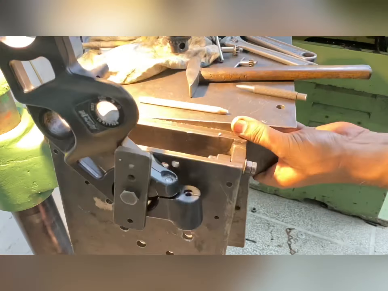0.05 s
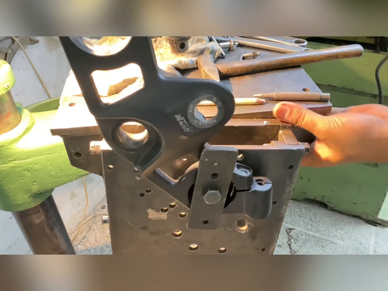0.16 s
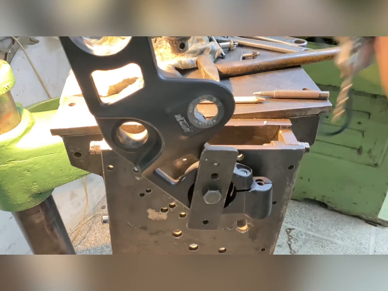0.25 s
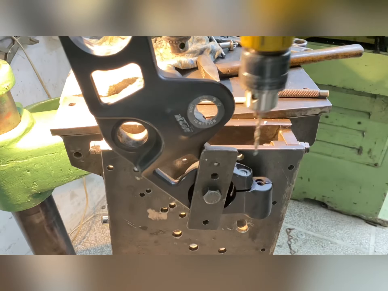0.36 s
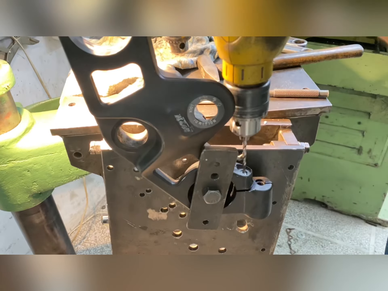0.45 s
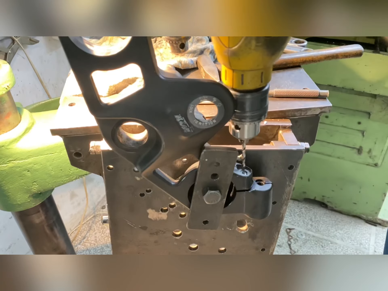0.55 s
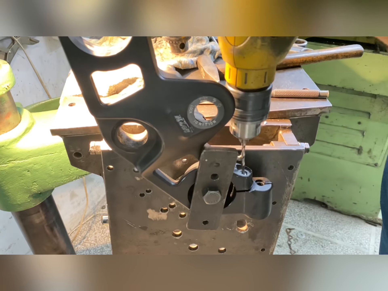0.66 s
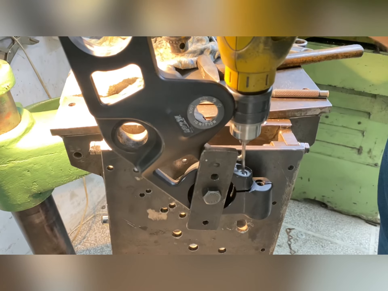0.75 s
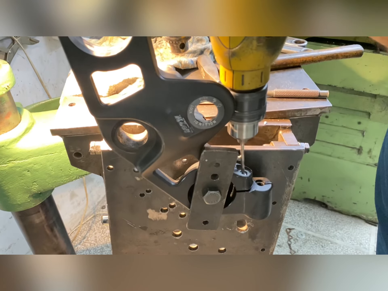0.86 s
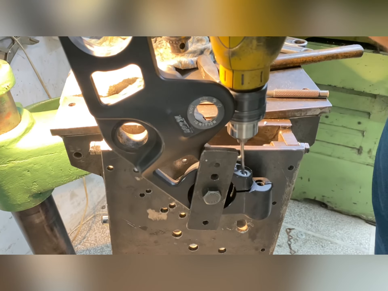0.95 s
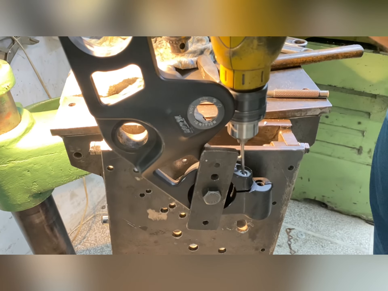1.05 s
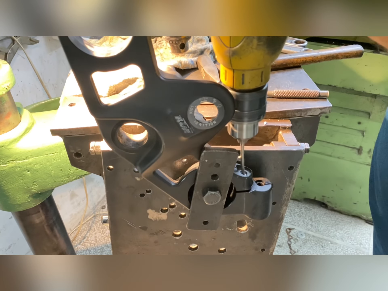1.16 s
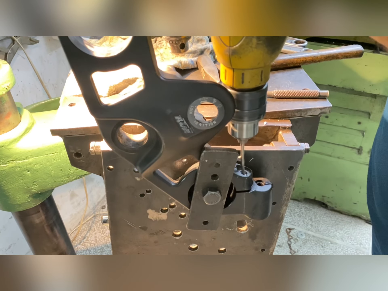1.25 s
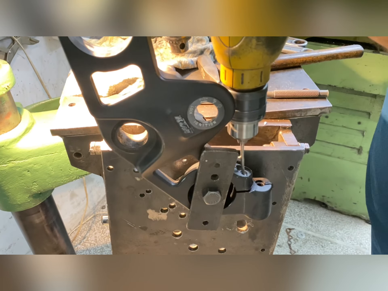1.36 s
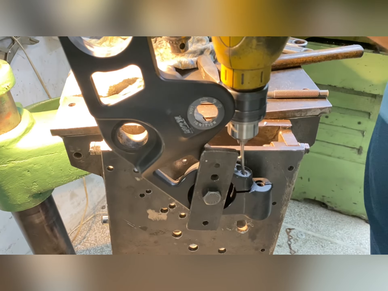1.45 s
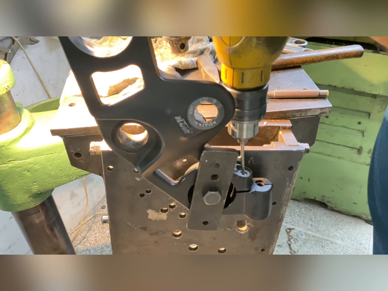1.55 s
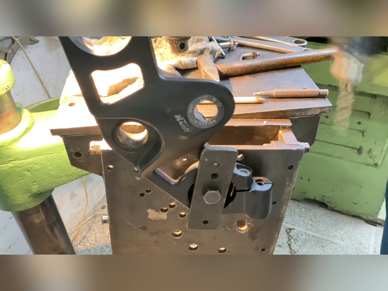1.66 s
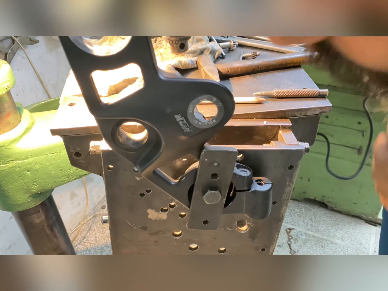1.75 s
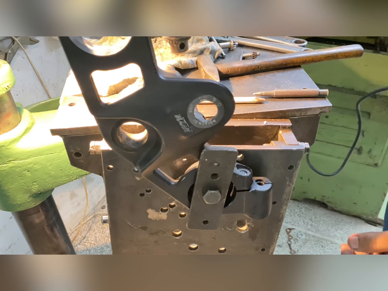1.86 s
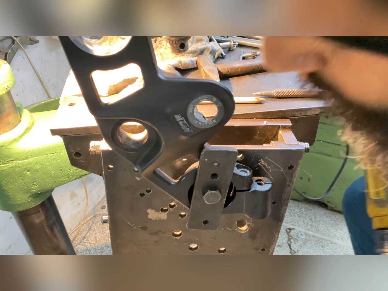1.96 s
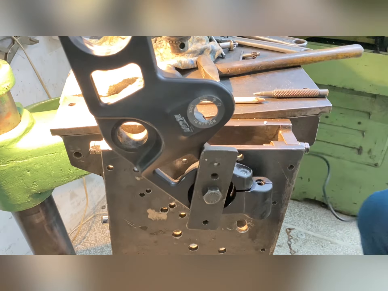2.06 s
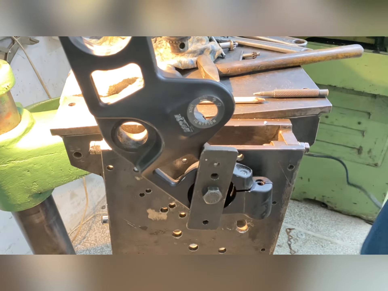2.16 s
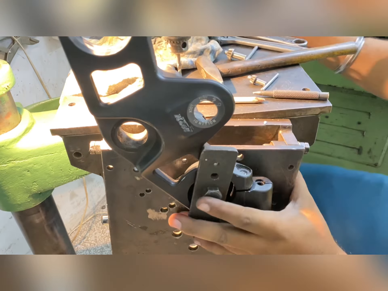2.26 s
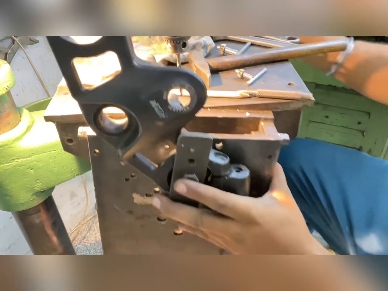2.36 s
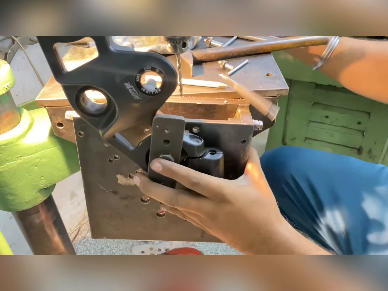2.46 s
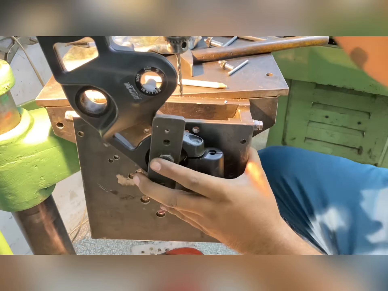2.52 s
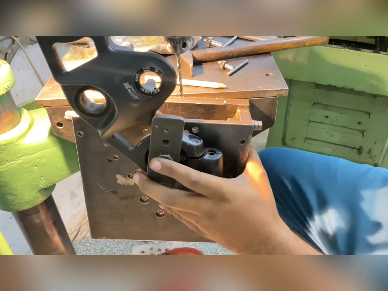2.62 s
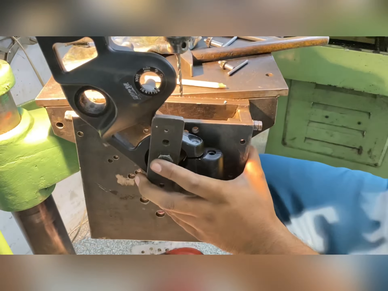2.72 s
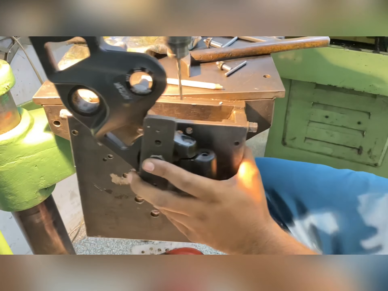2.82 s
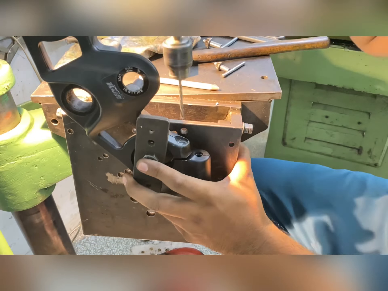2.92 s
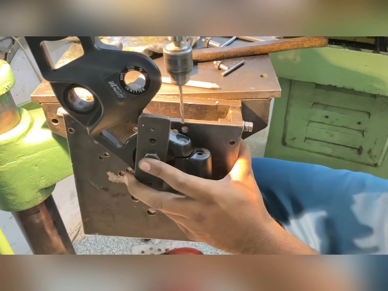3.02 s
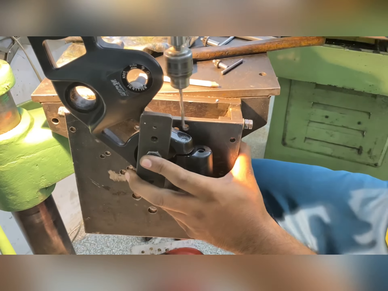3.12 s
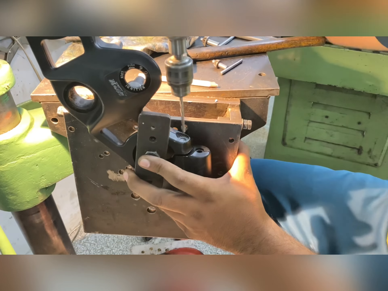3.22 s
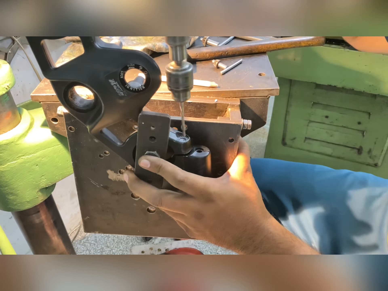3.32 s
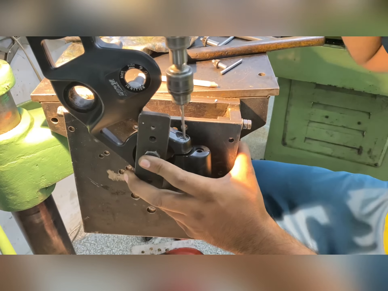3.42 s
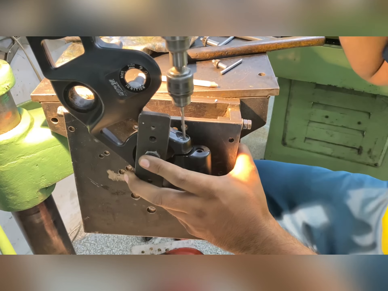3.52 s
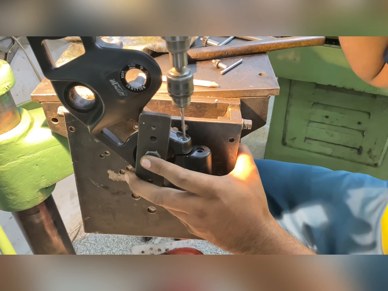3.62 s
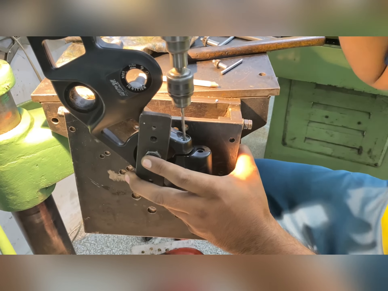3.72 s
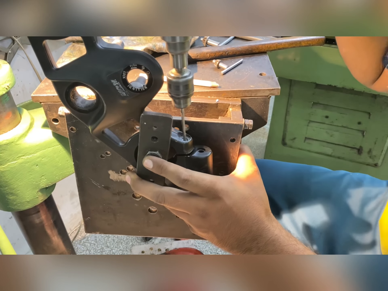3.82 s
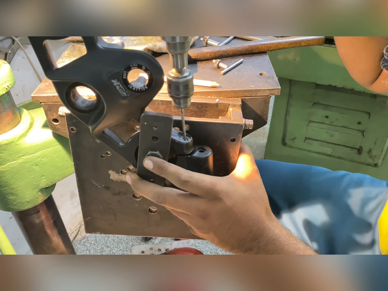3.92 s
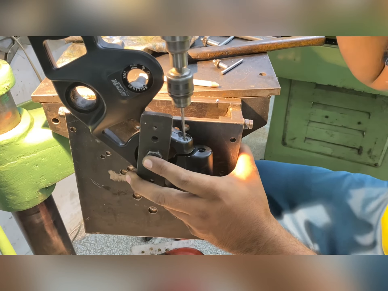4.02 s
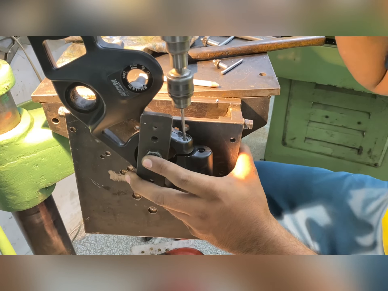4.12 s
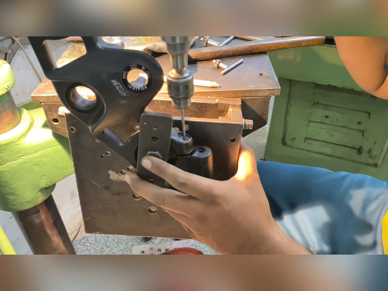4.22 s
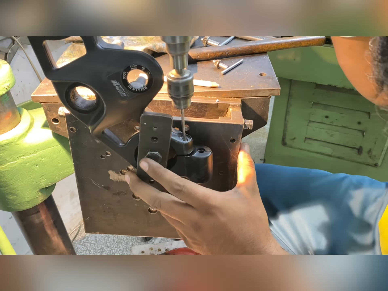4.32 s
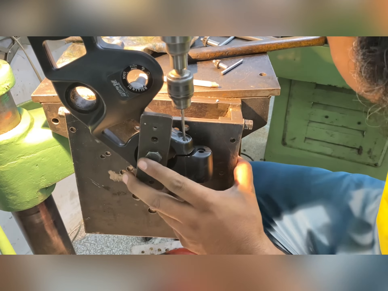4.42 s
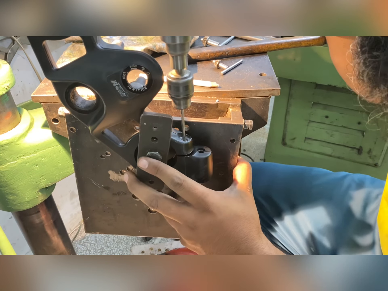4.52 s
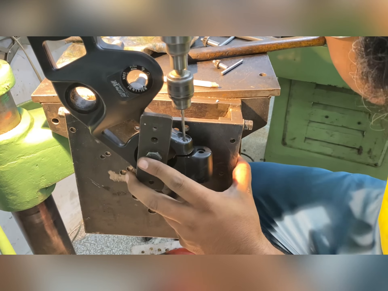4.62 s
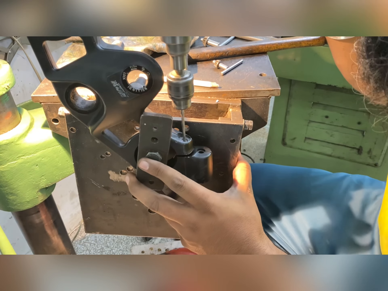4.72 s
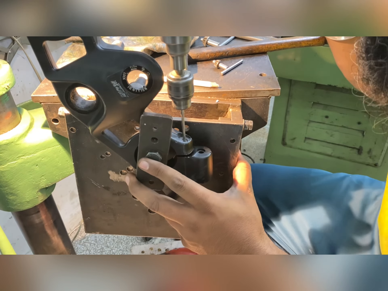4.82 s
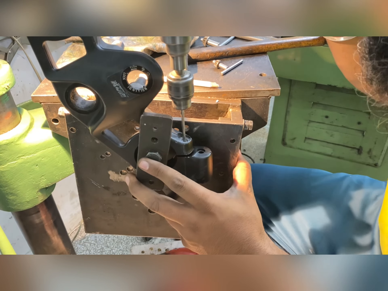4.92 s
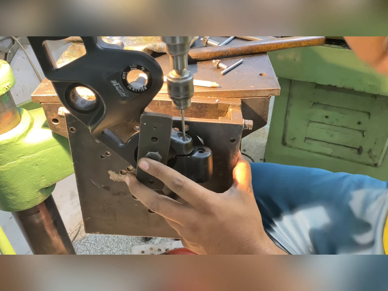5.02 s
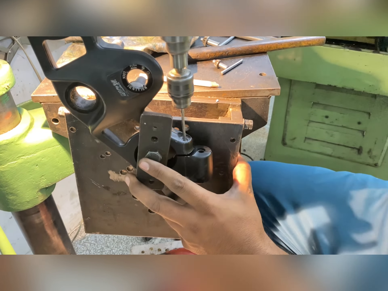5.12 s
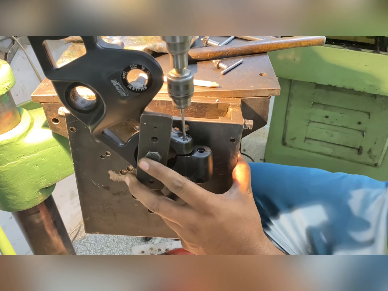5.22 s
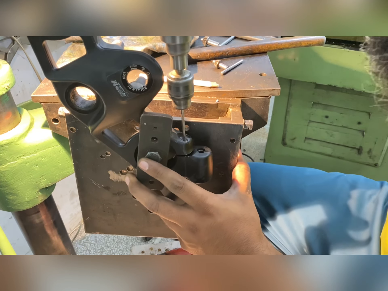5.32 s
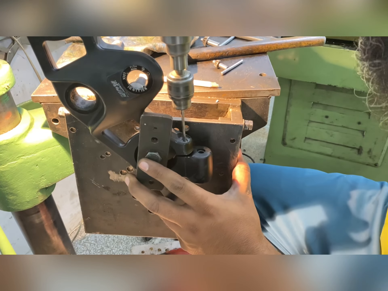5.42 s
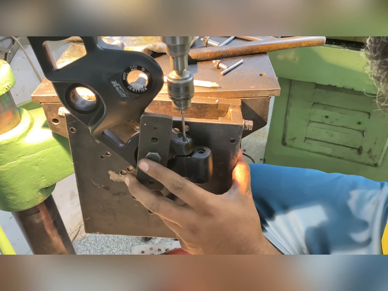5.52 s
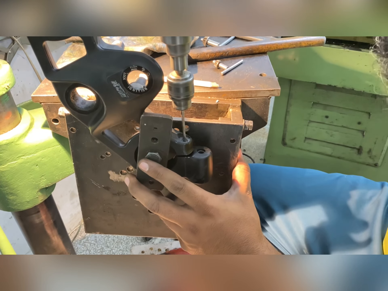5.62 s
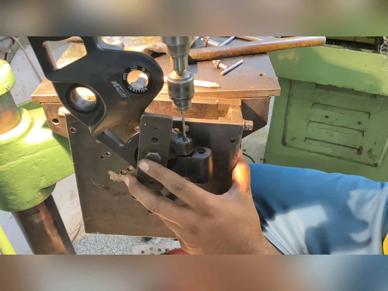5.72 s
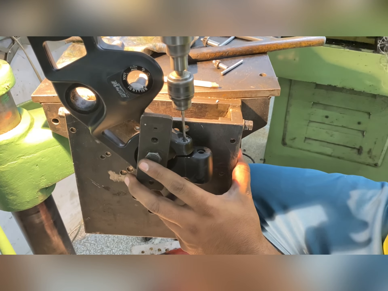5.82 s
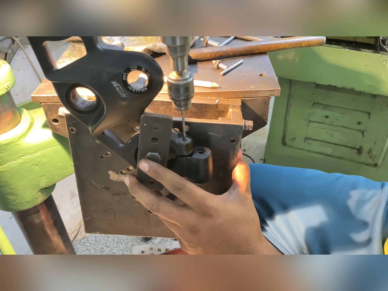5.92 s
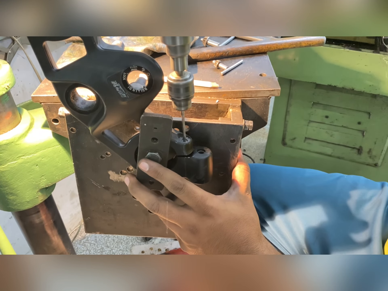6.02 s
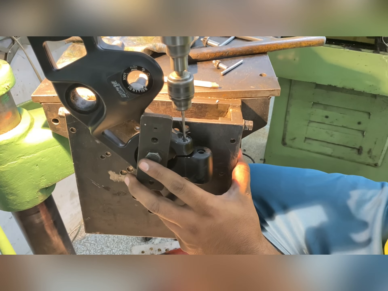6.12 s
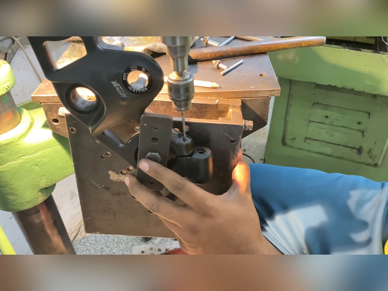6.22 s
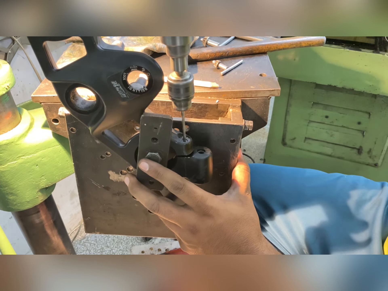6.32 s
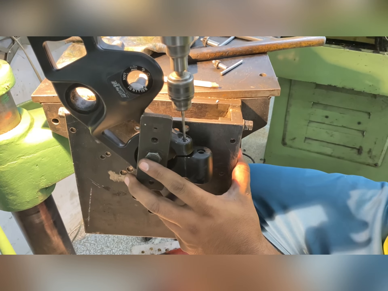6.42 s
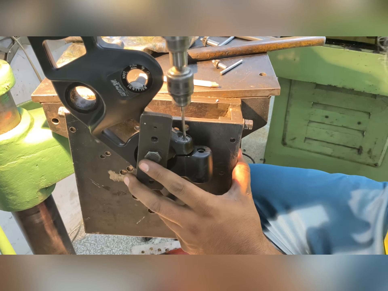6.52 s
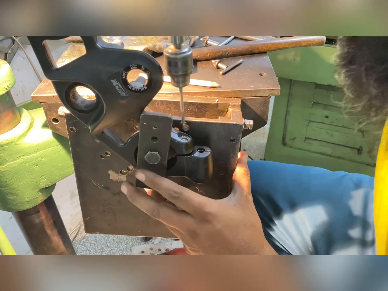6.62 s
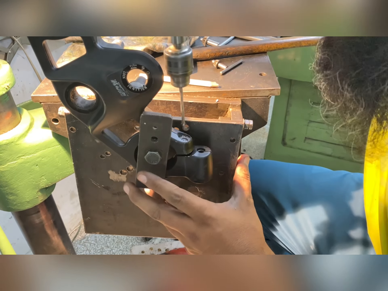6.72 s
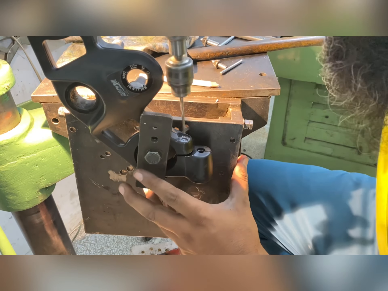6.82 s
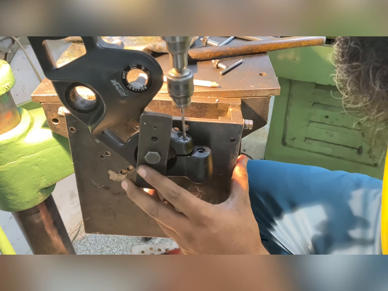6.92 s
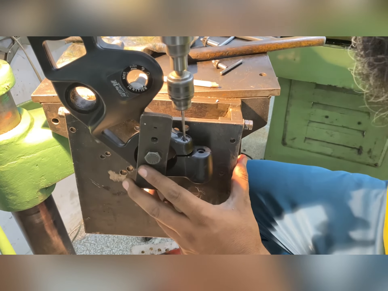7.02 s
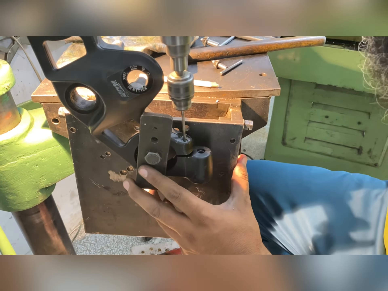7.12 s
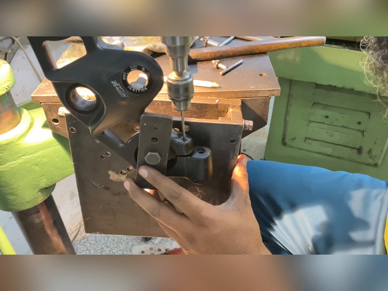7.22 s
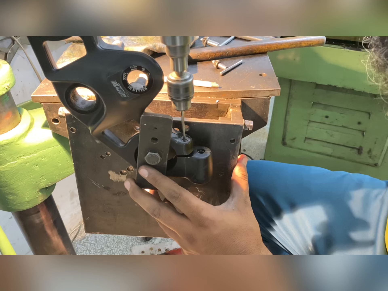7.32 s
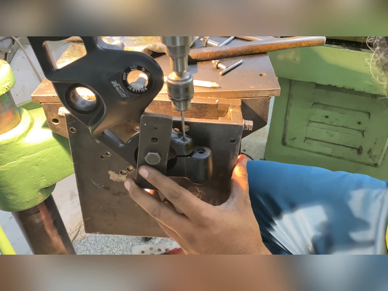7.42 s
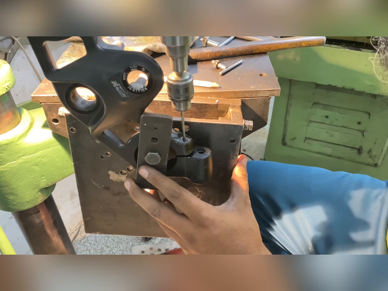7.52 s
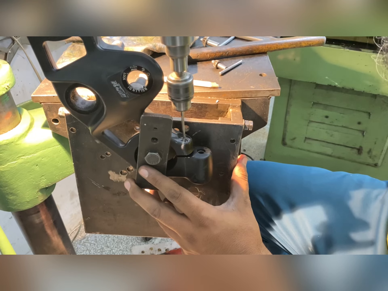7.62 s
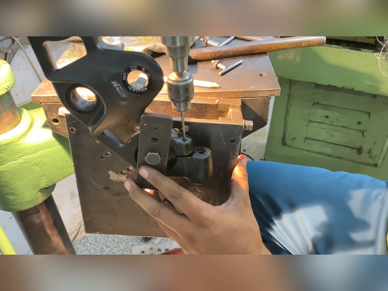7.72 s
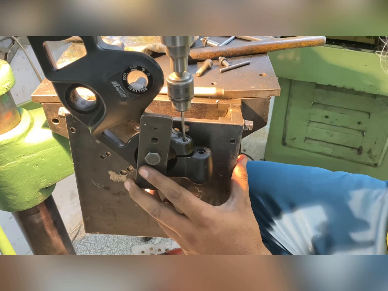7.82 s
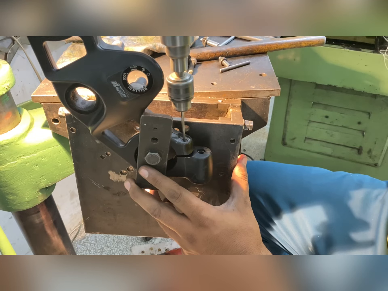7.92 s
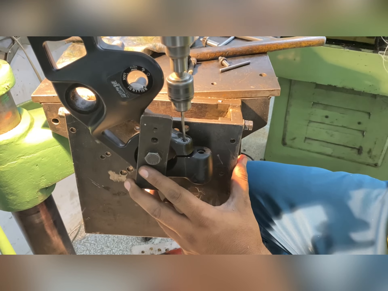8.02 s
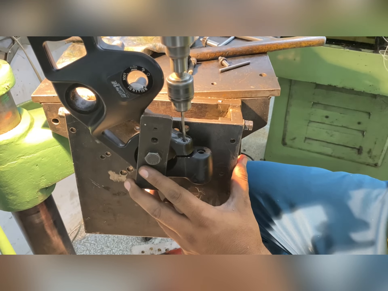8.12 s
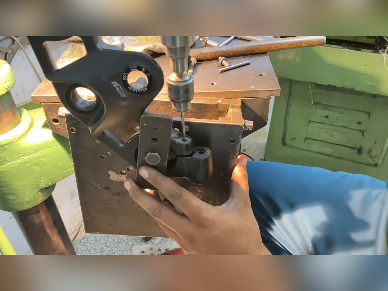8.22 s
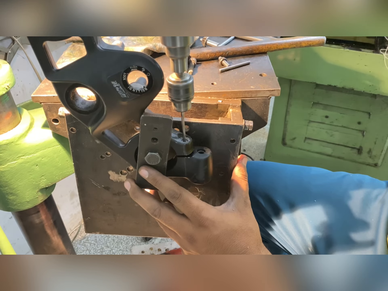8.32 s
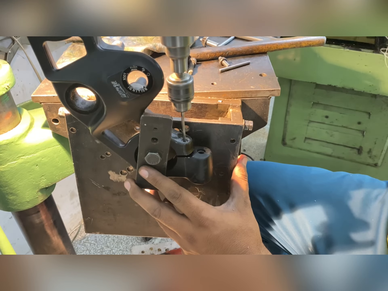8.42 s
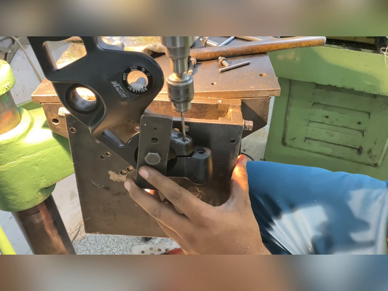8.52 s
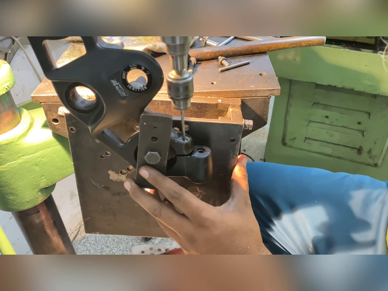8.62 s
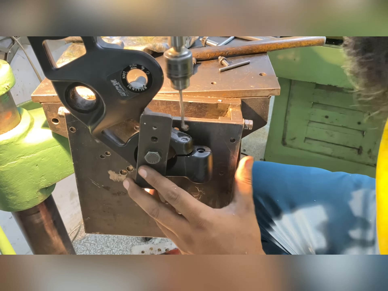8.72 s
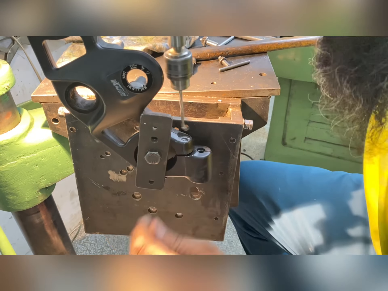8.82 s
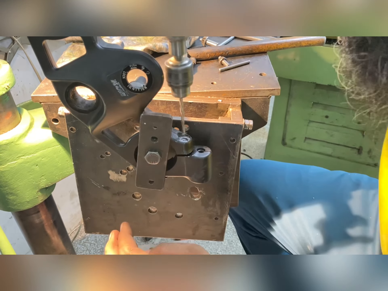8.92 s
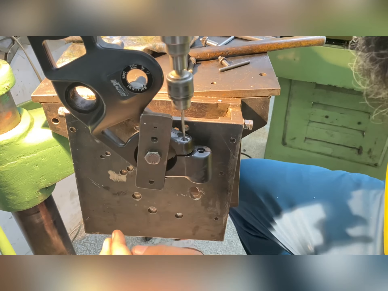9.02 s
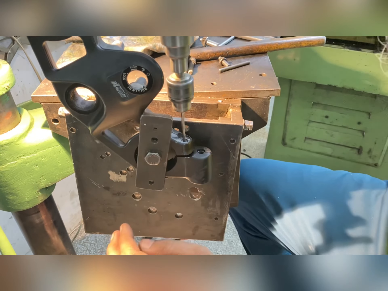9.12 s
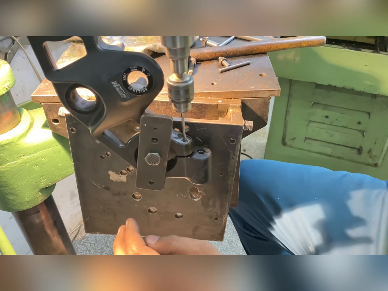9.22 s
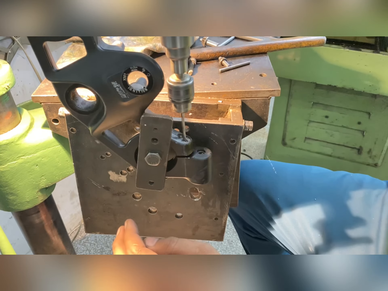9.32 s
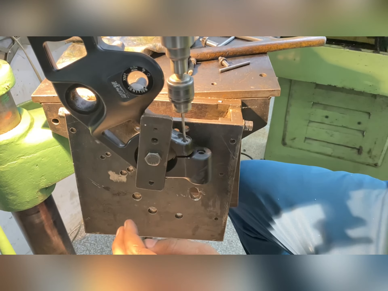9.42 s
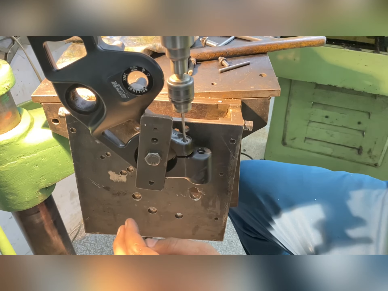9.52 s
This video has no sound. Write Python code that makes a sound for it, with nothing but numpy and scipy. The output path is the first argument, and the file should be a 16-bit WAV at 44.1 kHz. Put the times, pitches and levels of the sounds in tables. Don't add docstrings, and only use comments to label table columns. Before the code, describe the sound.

A hand drill skips and whines briefly, then a humming drill press grinds a small bit into steel in bright, raspy bursts.

```python
import sys
import numpy as np
from scipy import signal
from scipy.fft import rfft, irfft, next_fast_len
from scipy.io import wavfile
from scipy.ndimage import uniform_filter1d, map_coordinates

SR = 44100
rng = np.random.default_rng(int(sys.argv[2]) if len(sys.argv) > 2 else 0)


def field_ratio(decibels):
    return 10 ** (np.asarray(decibels, dtype=float) / 20)


def generate_wav(sig):
    pcm = np.round(np.clip(np.atleast_2d(sig).T, -1, 1) * 32767).astype(np.int16)
    wavfile.write(sys.argv[1], SR, pcm)


N = 421596
T = np.arange(N) / SR

# f/Hz, correlation
CORRELATION = [(100, 1), (1000, 0.92), (1500, 0.95), (2500, 0.027), (8000, 0.026), (15000, 0.44)]
# f/Hz, phase/rad
LEFT_LEAD = [(1500, 0), (2760, 0.77), (3530, 1.74), (4910, 0.79), (6370, 1.14), (7840, 0.87), (9470, 0.35),
             (12100, 1), (15400, 1.6)]
# f/Hz, level/dB
LEFT_LEAN = [(1290, 4), (2380, -3.5), (4400, 12), (8120, 4.5), (15000, -0.5)]

# f/Hz, density/dB per Hz
IDLE_SPECTRUM = [(35, -77), (60, -47), (123, -38.5), (253, 0.5), (359, -9.5), (519, -1), (583, -8),
                 (960, -4), (1060, -0.5), (2000, -12), (2600, -22), (4400, -120)]
# f/Hz, density/dB per Hz
BELT_SPECTRUM = [(35, -82), (60, -55), (97, -48.5), (306, -7.5), (376, -17), (441, -6), (496, -4.5),
                 (637, -14), (727, -13.5), (933, -8.5), (1000, -8), (1100, -8), (1330, -8.5), (1630, -16.5),
                 (2000, -17), (2600, -41), (4400, -120)]
# f/Hz, density/dB per Hz
HISS_SPECTRUM = [(880, -24), (1500, -10.5), (2190, -2), (2370, -5), (3000, -0.5), (5020, -5.5), (6500, -3),
                 (6760, -4), (9010, -9.5), (11900, -7.5), (13800, -14), (15200, -8), (16000, -47)]
# t/s, level/dB
AUTO_GAIN = [(0, -10.5), (.4, -9), (1.1, -5), (1.5, -10), (2.2, -4.5), (2.74, -7.5), (3.6, -1), (4.0, -0.5),
             (5.46, 0), (5.72, -5), (6.4, -8.5), (7.0, -4), (7.4, -5), (7.77, -10), (8.33, -6), (8.6, -9),
             (9.1, -6), (9.56, -11)]
# start t/s, end t/s, level/dB
DIPS = [
    (2.218, 2.234, -11.5),
    (2.565, 2.645, -9),
]

# t/s, level/dB
PART_STROKES = [
    (.03, -36),
    (.095, -44),
]
# f/Hz, width/Hz, level/dB
PART_MODES = [(4800, 270, -1), (7060, 370, -8), (9700, 4000, -7.5), (14100, 400, 3)]
# t/s, peak level/dB, low part over it/dB, T60/s
CLICK_EVENTS = [
    (0.3613, -34, -21, 0.086),
    (1.5776, -18, -27, 0.03),
    (2.063, -30, -8, 0.1),
    (2.484, -24.5, -16, 0.056),
    (2.5604, -14, -29, 0.019),
    (2.647, -23, -29, 0.056),
    (2.7493, -22, -6.5, 0.18),
    (8.6344, -26, -9, 0.039),
]
# t/s, peak level/dB, f/Hz, T60/s, bright puff over it/dB
BENCH_KNOCKS = [
    (1.775, -27, 704, 0.14, 3),
    (1.78, -29, 440, 0.19, -15),
    (1.78, -31, 1450, 0.11, -15),
    (1.952, -27, 370, 0.1, 5),
    (1.96, -32, 1000, .1, -15),
    (2.063, -20, 415, 0.11, -17),
    (2.065, -37, 950, 0.07, -15),
    (2.568, -17, 372, 0.013, -18),
    (2.752, -25, 1360, 0.11, -18),
    (2.755, -22, 2200, 0.1, -12),
]
# t/s, length/s, start f/Hz, end f/Hz, level/dB, roughness/Hz
METAL_SQUEAKS = [
    (.772, .05, 6300, 13200, -31, 400),
    (2.101, 0.058, 6620, 6640, -42, 80),
    (2.104, 0.058, 11050, 11170, -44, 110),
    (2.688, 0.06, 4400, 5150, -46, 300),
    (5.487, 0.115, 436, 430, -38.5, 6.7),
    (5.502, 0.12, 372, 370, -43, 6),
]

# t/s, armature f/Hz, whine level/dB, fan and gear noise level/dB, brush tone level/dB
DRILL_RUN = [(0.98, 643, -52, -32, -50), (1.036, 837, -53, -27, -38), (1.084, 1000, -40.5, -26, -29),
             (1.148, 1118, -43, -24.5, -33), (1.22, 1210, -43, -23.5, -36), (1.352, 1254, -37, -23, -32),
             (1.588, 1184, -48, -27, -36), (1.65, 963, -53, -33.5, -53), (1.77, 692, -56, -40, -48),
             (1.79, 705.9, -41, -37.5, -42), (1.82, 615.2, -55, -45, -52)]
# t/s, level/dB
FIRST_TURNS = [
    (.67, -29),
    (.76, -34.5),
    (1.0, -46),
]
# t/s, f/Hz, level/dB
RUN_DOWN = [
    (1.81, 13900, -62),
    (1.83, 12800, -44),
    (1.9, 9000, -50),
    (1.93, 7700, -59),
]
# f/Hz, density/dB per Hz
FAN_SPECTRUM = [(180, -35), (300, -8.5), (360, -18.5), (486, -21), (519, -15.5), (1100, -19), (1210, -14),
                (1320, -12.5), (3580, -5), (4990, -1), (8640, -8), (12700, -1.5), (16000, -13.5)]
# t/s, peak level/dB, low growl over it/dB
BIT_SKIPS = [(0.774, -8, -17), (0.7877, -3.5, -32), (0.804, -6.5, -37), (.822, -19, -23), (.836, -20, -15),
             (0.8486, -13, -21), (0.885, -13.5, -13), (.9035, -15.5, -24), (0.9105, -10, -27),
             (0.938, -18, -5), (0.959, -16, -7), (0.9644, -14, -21)]
# f/Hz, width/Hz, level/dB
HAND_BIT_MODES = [(5130, 150, -7.5), (6200, 200, -10), (7730, 140, -4), (9200, 160, -0.5),
                  (10500, 300, -21), (11740, 130, 7), (13500, 150, -8), (15000, 250, -8)]
# f/Hz, width/Hz, level/dB
HAND_VICE_MODES = [(2060, 450, -7), (2630, 56, -3), (3110, 125, 4)]

# f/Hz, roughness/Hz
MOTOR_TONES = [(243, 1.5), (315, 1), (736, .3), (995.4, 1), (1366, 1.5), (6413.6, .5), (7830, 40),
               (10900, 50), (11830, 40), (12310, 40)]
MOTOR_TONE_LEVELS = [-14.5, -9, -11.5, -5, -9, -6, -29, -9, -12, -28]
# t/s, beats so far
SLIP_BEATS = [
    (2.87, 0),
    (4.67, 9),
    (6.82, 20),
    (9.57, 34),
]

# t/s, level/dB
TIP_TOUCH = [(2.8, -55), (3.3, -50), (3.75, -49), (3.9, -43), (4.15, -43), (4.3, -48), (5.2, -49),
             (5.7, -54.5), (6.55, -61), (8.7, -66), (9.1, -40.5)]
# start t/s, end t/s
LEVER_DOWN = [
    (4.25, 6.51),
    (6.996, 8.63),
    (9.167, 9.7),
]
# start t/s, end t/s
BIT_CLEAR = [
    (6.6, 6.918),
    (8.7, 9.04),
]
# t/s, hold/s, level/dB
LEVER_PUSHES = [(4.343, 0.018, -40), (4.695, 0.36, -33.5), (5.453, 0.21, -31.5), (5.793, 0.067, -27),
                (6.038, 0.033, -34), (6.204, 0.074, -33.5), (6.278, 0.029, -33.5), (6.45, .08, -33),
                (7.095, 0.12, -27), (7.538, 0.048, -25), (7.807, 0.06, -36), (8.024, 0.052, -32),
                (8.14, 0.078, -31), (8.407, .12, -28), (9.165, 0.056, -21), (9.316, .12, -29)]

# f/Hz, width/Hz, level/dB
BIT_MODES = [(4960, 39, -6.5), (6280, 120, -32), (6700, 100, -10.5), (7270, 460, -17), (7730, 132, 2),
             (8450, 250, -22), (9000, 80, 0.5), (10020, 112, -0.5), (11530, 34, -32), (12300, 240, -9.5),
             (13300, 500, -16), (15000, 180, -33), (16600, 66.95, -18)]
# f/Hz, width/Hz, level/dB
SWARF_MODES = [(5930, 1660, -25), (10040, 1300, -9.5), (11700, 1100, -49), (14740, 740, -19.5)]
# f/Hz, width/Hz, level/dB
VICE_MODES = [(1766, 48, -4.5), (1935, 64.3, -8.5), (2418, 60.7, -7), (2654, 196, -10), (3060, 145, -3),
              (3540, 139, -6)]
# f/Hz, width/Hz, level/dB
RIM_MODES = [(7700, 200, -2), (9900, 400, -3), (12330, 200, -1), (15000, 1200, -15), (8000, 9000, -21)]
# t/s, peak level/dB, turns it repeats
RIM_TICKS = [
    (3.7885, -23, 2),
    (3.8566, -20, 2),
    (3.889, -23, 3),
    (3.974, -28, 1),
    (3.991, -13, 1),
    (4.0398, -22, 1),
    (4.987, -8.5, 1),
    (5.4583, -11, 2),
    (5.512, -6.5, 2),
    (9.0956, -18, 1),
]
# t/s, peak level/dB
FLUTE_BITES = [(5.696, -5), (5.7207, -6.5), (5.7494, -18), (5.7636, -10.5), (5.7959, -18), (5.8276, -22),
               (5.842, -16), (5.8546, -7), (5.8741, -7.5), (5.8894, -14), (5.916, -16.5), (5.9294, -26),
               (5.962, -16), (5.983, -13.5), (6.0008, -10), (6.0122, -14), (6.0453, -6.5), (6.0666, -5.5),
               (6.0806, -17), (6.115, -16.5), (6.131, -10.5), (6.1492, -11), (6.1649, -14), (6.1915, -25),
               (6.2102, -9.5), (6.2315, -11), (6.2488, -11), (6.282, -11), (6.2912, -12), (6.3086, -14),
               (6.3276, -5), (6.3423, -15), (6.3594, -22.5), (6.3807, -11), (6.3927, -11), (6.4163, -15),
               (6.431, -19.5), (6.4484, -16), (6.4587, -8), (6.4833, -8.5),
               (7.0012, -19), (7.0174, -22), (7.0339, -16), (7.0852, -16.5), (7.0997, -17), (7.1164, -12),
                (7.1344, -14), (7.1754, -8), (7.235, -13), (7.2511, -17), (7.2677, -18), (7.2846, -15),
                (7.3008, -20), (7.3146, -14.5), (7.3326, -16), (7.3783, -12), (7.4008, -18),
                (7.4161, -13.5), (7.449, -9), (7.467, -12), (7.4829, -15), (7.499, -20), (7.5287, -6.5),
                (7.5763, -9), (7.594, -7), (7.6242, -12), (7.643, -8.5), (7.665, -7.5), (7.679, -11),
                (7.7324, -15), (7.7463, -17), (7.7657, -14), (7.7842, -16.5), (7.8123, -17), (7.8277, -15),
                (7.8409, -19), (7.871, -15.5), (7.8894, -16.5), (7.9148, -26),
               (7.9511, -19), (7.9671, -15.5), (7.9845, -18), (8.0016, -11), (8.0182, -10), (8.0354, -10),
              (8.0538, -9), (8.068, -7), (8.085, -12), (8.1017, -17), (8.1208, -9.5), (8.1372, -16),
              (8.1568, -15.5), (8.171, -24), (8.1882, -11), (8.201, -6), (8.2475, -19.5), (8.308, -10),
              (8.328, -14), (8.3457, -7), (8.3537, -11), (8.376, -8), (8.3912, -15), (8.4274, -10.5),
              (8.446, -10.5), (8.4673, -5.5), (8.4882, -17.5), (8.5105, -19), (8.523, -13), (8.5637, -15),
              (9.1668, -18), (9.1845, -10), (9.2878, -15), (9.3217, -15), (9.3375, -10), (9.3634, -8.5),
              (9.3868, -18), (9.3989, -19), (9.4134, -18), (9.431, -18), (9.446, -10), (9.4544, -20),
              (9.4636, -14), (9.4817, -19), (9.5164, -16), (9.5342, -16), (9.5544, -18)]
# f/Hz, width/Hz, depth 0-1
ANTIRESONANCES = [(4200, 660, 0.5), (5670, 430, 1), (8040, 250, 0.6), (8740, 260, 0.5), (11400, 170, 0.9),
                  (10440, 610, 1), (14050, 750, 0.7)]
# f/Hz, level/dB
CUT_WHISTLES = [(10950, -4), (11600, 1), (12330, 8), (12900, -16)]

FLUTE_HZ = 59.3
HOLE_S = 5.69


def unit(x):
    return x / np.sqrt(np.mean(x ** 2) + 1e-20)


def along(points, hz):
    f, v = np.transpose(points)
    return np.interp(np.log(hz + 1), np.log(f + 1), v)


def curves(rows):
    s, *columns = np.transpose(rows)
    return [np.interp(T, s, column) for column in columns]


def during(t0, t1, fade):
    return np.clip(np.minimum(T - t0, t1 - T) / fade, 0, 1)


def wobble(rate):
    knots = rng.standard_normal(int(N * rate / SR) + 4)
    return map_coordinates(knots, [T * rate], order=1)


def tone(hz):
    return np.sqrt(2) * np.sin(2 * np.pi * np.cumsum(hz + 0 * T) / SR)


def rush(spectrum, patchy_db):
    z = signal.stft(rng.standard_normal((2, N)), nperseg=512)[2]
    field = uniform_filter1d(rng.standard_normal(z.shape[1:]), size=5, axis=0)
    field = uniform_filter1d(field, size=8, axis=1)
    patchy = signal.istft(z * field_ratio(patchy_db * unit(field)), nperseg=512)[1][:, :N]
    size = next_fast_len(N)
    hz = np.fft.rfftfreq(size, 1 / SR)
    pair = rfft(patchy, size) * field_ratio(along(spectrum, hz))
    turn = np.arccos(np.clip(along(CORRELATION, hz), -1, 1)) / 2
    mid, side = irfft(pair * [np.cos(turn), np.sin(turn)], size)[:, :N]
    return np.array([mid + side, mid - side])


def band_unit(x, lo_hz, hi_hz):
    hz, power = signal.welch(x.mean(0), SR, nperseg=2048)
    return x / np.sqrt(power[(hz > lo_hz) & (hz < hi_hz)].sum() * hz[1])


def scrape(times, dbs, modes, life_s, scatter_db, rise_s=0.0015, rasp=0):
    out = np.zeros((2, N))
    at = np.clip(np.round(times * SR).astype(int), 0, N - 1)
    n = min(N, at.max() + SR // 2)
    luck = scatter_db * rng.standard_normal((len(at), len(modes)))
    rise, decay = np.exp(-1 / (rise_s * SR)), np.exp(-1 / (life_s * SR))
    envelope_poles = np.convolve([1, -rise], [1, -decay])
    steady = (rasp + 0 * T)[:n]
    for (hz, width_hz, db), mode_db in zip(modes, luck.T):
        hits = np.bincount(at, field_ratio(dbs + db + mode_db), n)
        burst = signal.lfilter([1 - rise], envelope_poles, hits)
        friction = (burst + steady * field_ratio(db)) * rng.standard_normal(n)
        r, w = np.exp(-.7 * np.pi * width_hz / SR), 2 * np.pi * hz / SR
        ring = signal.lfilter([1 - r, 0, r - 1], [1, -2 * r * np.cos(w), r * r], friction)
        late = (np.roll(ring, 1) - np.cos(w) * ring) / np.sin(w)
        lean_db, lead = along(LEFT_LEAN, hz), along(LEFT_LEAD, hz)
        right = np.cos(lead) * ring + np.sin(lead) * late
        out[:, :n] += [field_ratio(lean_db / 2) * ring, field_ratio(-lean_db / 2) * right]
    return out


def shop():
    rumble_db, idle_hiss_db, run_hiss_db = -40.5, -49.5, -47.5
    gain_db, = curves(AUTO_GAIN)
    running = during(2.7, N / SR + 1, 0.057)
    idle = band_unit(rush(IDLE_SPECTRUM, patchy_db=2.0), 200, 1470)
    belts = band_unit(rush(BELT_SPECTRUM, patchy_db=2.0), 200, 1470)
    rumble = field_ratio(rumble_db + gain_db) * (np.sqrt(1 - running) * idle + np.sqrt(running) * belts)
    hiss_db = idle_hiss_db + running * (run_hiss_db - idle_hiss_db) + 0.97 * gain_db
    return rumble + field_ratio(hiss_db) * band_unit(rush(HISS_SPECTRUM, patchy_db=2.0), 3340, 4970)


def rubs():
    s, db = np.transpose(PART_STROKES)
    return scrape(s, db + 11.0, PART_MODES, life_s=0.025, scatter_db=3.0, rise_s=0.01)


def bandpass_noise(n, band):
    sos = signal.butter(2, band, "band", fs=SR, output="sos")
    return unit(signal.sosfilt(sos, rng.standard_normal(n)))


def handling():
    out, t = np.zeros(N + SR), np.arange(SR // 5) / SR
    for s, db, low_db, t60 in CLICK_EVENTS:
        crack = bandpass_noise(len(t), [3200, 15000]) + field_ratio(low_db) * bandpass_noise(len(t), [910, 3200])
        out[round(s * SR):][:len(t)] += field_ratio(db - 7.5 - 60 * t / min(t60, .2)) * crack
    for s, db, hz, t60, puff_db in BENCH_KNOCKS:
        body = signal.lfilter(*signal.iirpeak(hz, 3.5, SR), rng.standard_normal(len(t)))
        puff = signal.lfilter([1], [1, -.6], rng.standard_normal(len(t)))
        envelope = field_ratio(db - 5.5 - 60 * t / t60) * (1 - np.exp(-t / (0.052 * t60)))
        out[round(s * SR):][:len(t)] += envelope * (unit(body) + field_ratio(puff_db - 3.5) * unit(puff))
    out = signal.sosfilt(signal.butter(2, 230, "high", fs=SR, output="sos"), out[:N])
    for s, length, hz0, hz1, db, rough_hz in METAL_SQUEAKS:
        glide_hz = np.interp(T, [s, s + length], [hz0, hz1]) + rough_hz * wobble(320)
        out += field_ratio(db + 3.3 * wobble(60)) * during(s, s + length, length / 3) * tone(glide_hz)
    return out


def hand_drill():
    hz, whine_db, fan_db, brush_db = curves(DRILL_RUN)
    whine = field_ratio(whine_db + 0.73 * wobble(60.0)) * tone(hz)
    brushes = field_ratio(brush_db - 5 + 4 * wobble(150)) * tone(12 * hz + 130 * wobble(300))
    mesh = field_ratio(fan_db - 13) * during(1.07, 1.64, .05) * (.6 + .7 * wobble(220)) * tone(4.1 * hz)
    turning = during(1.0, 2.0, 0.039) * (whine + brushes + mesh)

    fan_db = np.where(T < DRILL_RUN[0][0], curves(FIRST_TURNS)[0], fan_db)
    fan_gain = field_ratio(fan_db - 1.5 + wobble(90)) * during(0.678, 2.0, 0.012)
    fan = fan_gain * unit(rush(FAN_SPECTRUM, patchy_db=0.5))

    coast_hz, coast_db = curves(RUN_DOWN)
    coast = field_ratio(coast_db) * during(1.8, 2.6, .01) * tone(coast_hz + 40 * wobble(200))

    s, db, growl_db = np.transpose(BIT_SKIPS)
    drag_from, drag_to = .772, .99
    bit_modes = [*HAND_BIT_MODES, (6480, 1400, -22.0), (11200, 6700, -13.5)]
    skips = scrape(s, db + 8.5, bit_modes, life_s=0.0039, scatter_db=1.5, rise_s=0.0023,
                   rasp=field_ratio(-24.5) * during(drag_from, drag_to, 0.0083))
    growl = scrape(s, db + growl_db + 9, HAND_VICE_MODES, life_s=0.013, scatter_db=0,
                   rasp=field_ratio(-29.0) * during(drag_from, drag_to, 0.005))

    cut_s = np.arange(1.12, 1.6, .004)
    rub = scrape(cut_s, np.interp(cut_s, T, fan_db) - 2.0, BIT_MODES, life_s=0.004, scatter_db=6.5)
    return turning + fan + coast + skips + growl + rub


def feed():
    press_db_per_s, ease_db_per_s = 96, 114
    down = sum(during(t0, t1, 0.01) for t0, t1 in LEVER_DOWN)
    pushed = 0
    for s, hold, db in LEVER_PUSHES:
        before, after = np.maximum(s - T, 0), np.maximum(T - s - hold, 0)
        pushed = pushed + field_ratio(db - press_db_per_s * before - ease_db_per_s * after) ** 2
    level_db = 10 * np.log10(down ** 2 * pushed + field_ratio(curves(TIP_TOUCH)[0]) ** 2)
    not_yet = 1 - during(TIP_TOUCH[0][0], N / SR + 1, 0.025)
    lifted = sum(during(t0, t1, 0.023) for t0, t1 in BIT_CLEAR)
    return level_db - 80 * (not_yet + lifted)


def motor(cut_db):
    hum_db, hum_hz, slot_hz = -42.5, 497.6, 2226.5
    duck, duck_from_db, duck_s = 0.24, -44, 0.42
    load_db = uniform_filter1d(np.maximum(cut_db - duck_from_db, 0), round(duck_s * SR) + 1)
    db = hum_db + curves(AUTO_GAIN)[0] - duck * load_db
    slow_db = uniform_filter1d(db, size=SR // 2)
    hum = field_ratio(db + 3.0) * tone(hum_hz)
    for (hz, rough_hz), rel_db in zip(MOTOR_TONES, MOTOR_TONE_LEVELS):
        waver = field_ratio(1.5 * wobble(10)) * tone(hz + rough_hz * wobble(15 + 8 * rough_hz))
        hum = hum + field_ratio(slow_db + rel_db) * waver
    swell = np.clip(0.6 + 0.54 * np.cos(2 * np.pi * curves(SLIP_BEATS)[0]), 0, 1)
    hum = hum + field_ratio(slow_db - 4.0) * swell * tone(slot_hz)
    return during(2.76, N / SR + 1, 0.0087) * hum


def repeats(rows):
    return np.transpose([(s + k / FLUTE_HZ, db - 3.7 * k)
                         for s, db, turns in rows for k in range(max(round(turns), 1))])


def press_bit(cut_db):
    bite_s, bite_db = np.transpose(np.array(FLUTE_BITES))
    tick_s, tick_db = repeats(RIM_TICKS)

    step_s = np.r_[np.sort(np.r_[tick_s, bite_s]), N / SR]
    steps = np.maximum(np.round(np.diff(step_s) * 2 * FLUTE_HZ), 1)
    half_turns = np.r_[0, np.cumsum(steps)]
    count = np.arange(half_turns[-1])
    times = np.interp(count, half_turns, step_s)
    second = (count - half_turns[np.searchsorted(half_turns, count, "right") - 1]) % 2

    depth_db = np.interp(times, T, cut_db)
    chatter_db = .5 * np.minimum(depth_db + 31.5, 0)
    slide_db = -4.5 * (times < HOLE_S)
    weaker_db = np.clip(1.6 * (-28.5 - depth_db), 0, 9) * second
    flute_db = depth_db + chatter_db + slide_db - weaker_db + 2 * rng.standard_normal(len(times))
    flute_db[np.abs(times[:, None] - bite_s).min(axis=1) < .003] = -120
    at, dbs = np.r_[times, bite_s], np.r_[flute_db + 26, bite_db + 14.5]

    rasp_share_db = 0.27 * np.maximum(-11.0 - cut_db, 0) * (T < HOLE_S)
    rasp_db = cut_db - 1.0 + 1.3 * wobble(40) + rasp_share_db
    growl_db = np.where(T < HOLE_S, -6.5, -12) - 0.26 * (np.maximum(cut_db, -55) + 42.5)
    low_db = dbs + np.interp(at, T, growl_db) + 0.5

    bright = scrape(at, dbs, [*BIT_MODES, *SWARF_MODES], life_s=0.0031, scatter_db=1.5, rise_s=0.0014,
                    rasp=field_ratio(rasp_db))
    growl = scrape(at, low_db, [*VICE_MODES, (2884, 1900, -15.5)], life_s=0.0056, scatter_db=3.0,
                   rise_s=0.0031, rasp=field_ratio(rasp_db + growl_db + 11.5))
    ticks = scrape(tick_s, tick_db + 8.0, RIM_MODES, life_s=0.0044, scatter_db=2.5, rise_s=0.00044)
    out = bright + growl + ticks
    for hz, width_hz, depth in ANTIRESONANCES:
        peak = signal.lfilter(*signal.iirpeak(hz, hz / width_hz, SR), out)
        out = out - np.clip(depth, 0, 1) * peak
    whistle_db = np.minimum(cut_db, -36) - 12.5
    return out + sum(field_ratio(whistle_db + db) * wobble(150) * tone(hz) for hz, db in CUT_WHISTLES)


def room(x, t60):
    t = np.arange(SR // 4) / SR
    tail = field_ratio(-60 * t / t60) * rng.standard_normal((2, len(t)))
    return signal.fftconvolve(x, tail / np.linalg.norm(tail[0]), axes=1)[:, :N]


def scene():
    cut_db = feed()
    near = press_bit(cut_db) + hand_drill() + rubs() + handling() * field_ratio([[.5], [-.5]])
    dip_db = sum(db * during(t0, t1, 0.0027) for t0, t1, db in DIPS)
    background = shop() * field_ratio(dip_db) + motor(cut_db)
    return near + field_ratio(-13) * room(near, t60=.2) + background * field_ratio([[.6], [-.6]])


def top_cut(x):
    return signal.sosfilt(signal.butter(12, 16990, fs=SR, output="sos"), x)


def record(dry):
    mix = dry / (1 + np.abs(dry / .55) ** 4) ** (1 / 4)
    mix = signal.sosfilt(signal.butter(6, 150, "high", fs=SR, output="sos"), mix)
    self_noise = rng.standard_normal(N) + .5 * rng.standard_normal((2, N))
    mix = mix + field_ratio(-70) * signal.lfilter([.03], [1, -.97], self_noise)
    mix = signal.sosfilt(signal.ellip(8, .5, 45, 15780, fs=SR, output="sos"), mix)
    return top_cut(mix)


dry = scene()
out = record(dry)
generate_wav(out)
```